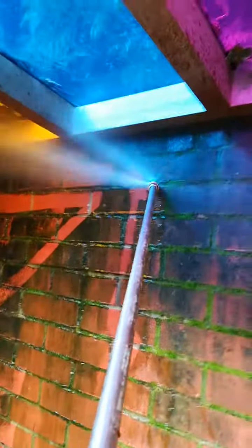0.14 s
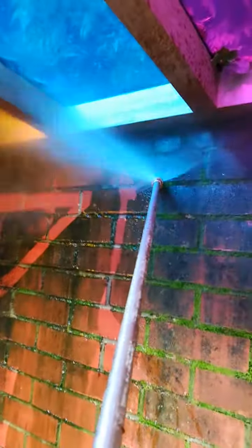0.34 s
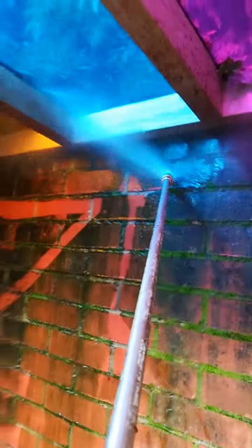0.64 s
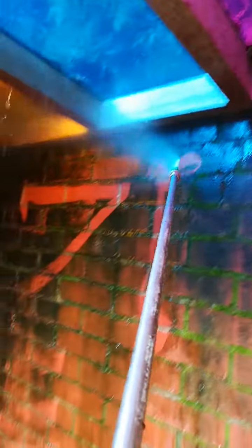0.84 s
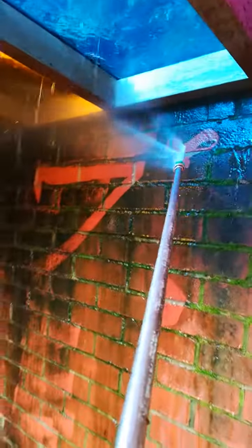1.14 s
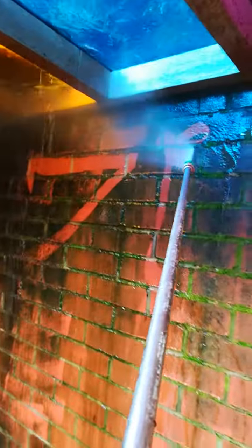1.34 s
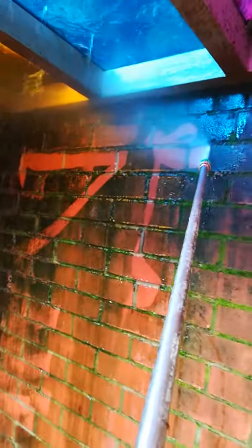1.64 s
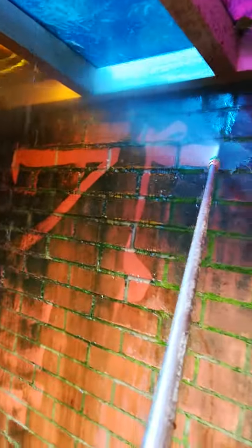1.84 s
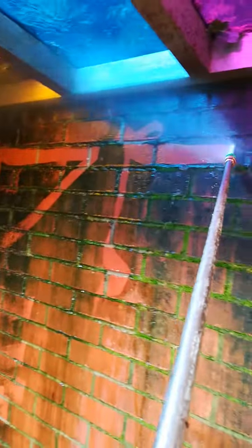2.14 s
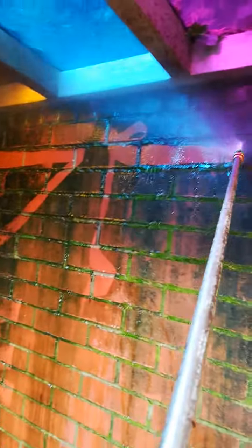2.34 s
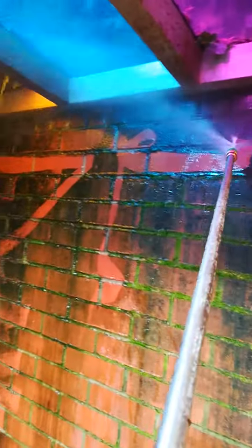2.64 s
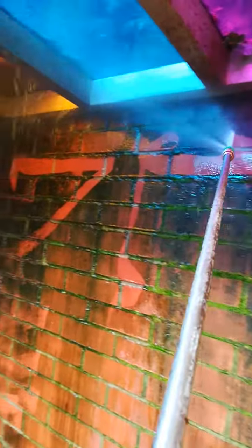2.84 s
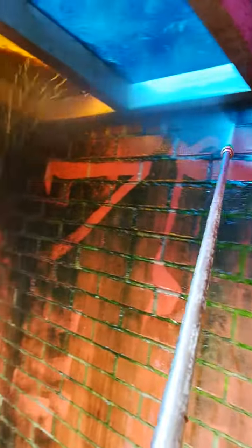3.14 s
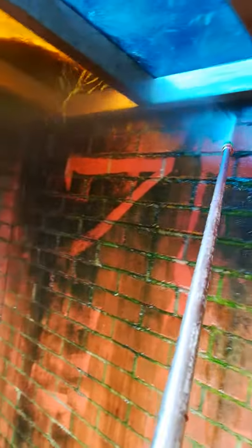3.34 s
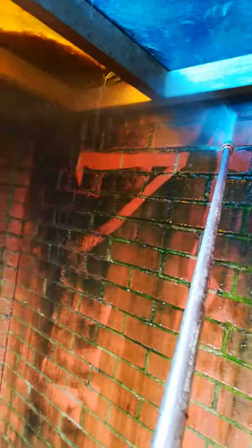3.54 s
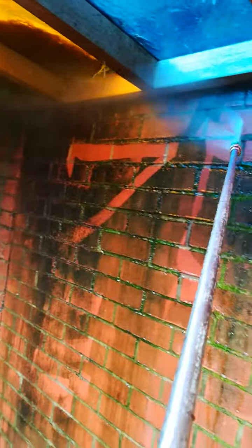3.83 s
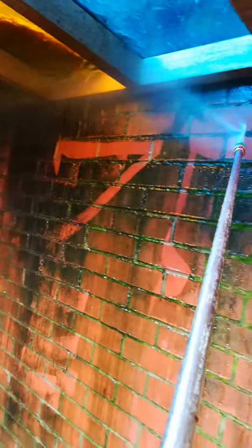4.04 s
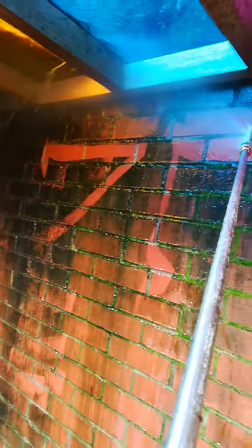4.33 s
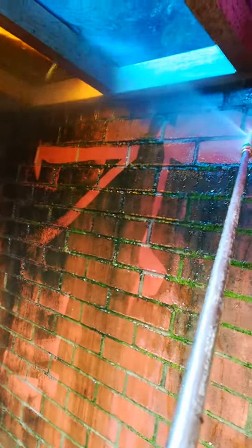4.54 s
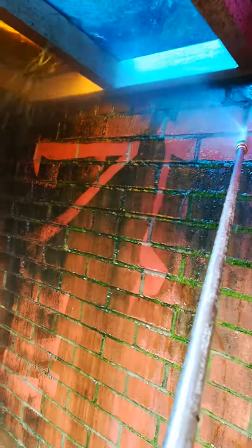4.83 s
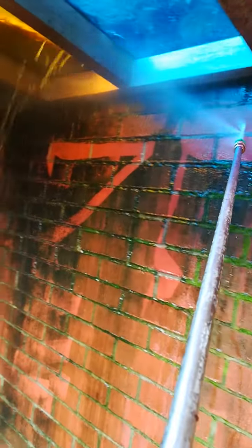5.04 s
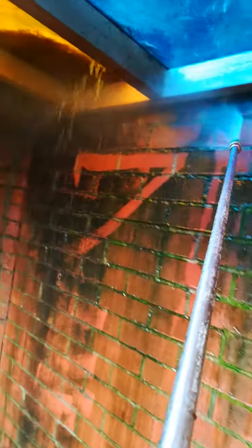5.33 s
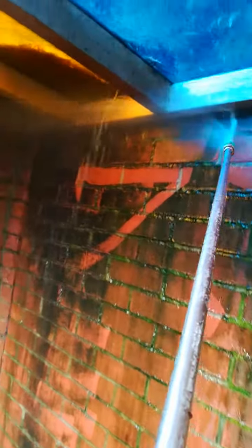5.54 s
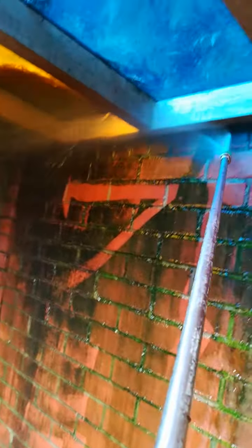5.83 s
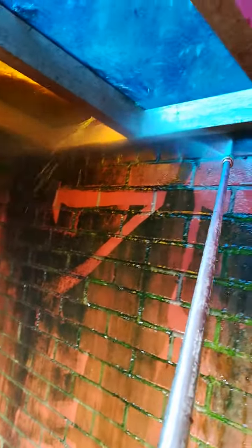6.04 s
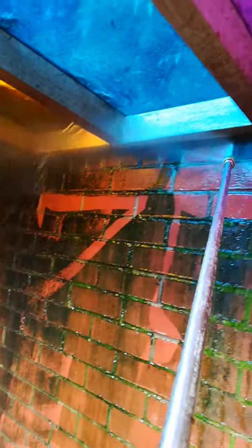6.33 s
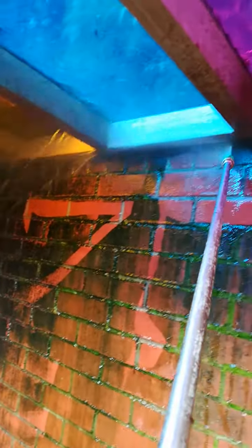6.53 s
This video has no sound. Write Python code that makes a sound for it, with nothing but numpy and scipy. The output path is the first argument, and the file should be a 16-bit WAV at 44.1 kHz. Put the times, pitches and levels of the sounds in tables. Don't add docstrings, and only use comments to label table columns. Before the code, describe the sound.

A high-pressure water jet starts uneven and splashy, with blown air rumbling and booming beneath a low roof. Within a second it bites into brick with a full, bright hiss, fluttering slightly and spitting on edges. The deep air calms. A motor pump hums steadily throughout. Close, hand-held stereo pickup with short, dull wall reflections and a sharply limited top end.

```python
import sys
import numpy as np
from scipy import signal
from scipy.fft import rfft, irfft, next_fast_len
from scipy.io import wavfile

SR = 44100
rng = np.random.default_rng(int(sys.argv[2]) if len(sys.argv) > 2 else 0)


def decibels_to_gain(level_db):
    exponent = np.asarray(level_db, float) / 20
    return 10 ** exponent


def unload_wav(signal):
    wavfile.write(
        sys.argv[1],
        SR,
        np.round(np.clip(np.atleast_2d(signal).T, -1, 1) * 32767).astype(np.int16),
    )


N = 295470
STEP = 20
SHAFT_HZ = 46.282


def rms_one(x):
    return x / np.sqrt(np.mean(x ** 2) + 1e-20)


def per_sample(control):
    return np.interp(np.arange(N), np.arange(0, N, STEP), control)


def in_time(rows):
    s, *columns = np.transpose(rows)
    t = np.arange(0, N, STEP) / SR
    return np.array([np.interp(t, s, c) for c in columns])


def at_hz(rows, hz):
    knots, *columns = np.transpose(rows)
    return np.array([np.interp(np.log(hz), np.log(knots), c) for c in columns])


def drift(rate_hz):
    settle = 4000
    r = np.exp(-2 * np.pi * rate_hz * STEP / SR)
    noise = rng.standard_normal(len(range(0, N, STEP)) + settle)
    return rms_one(signal.lfilter([1], [1, -2 * r, r * r], noise)[settle:])


def between(curves, centres, hz):
    weights = [np.interp(np.log(hz), np.log(centres), one) for one in np.eye(len(centres))]
    return np.array(weights) @ curves


def lean_to(hz):
    t60_s, echo_db, dull_hz = 0.12, -7.5, 2200
    t = np.arange(SR // 4) / SR
    decaying = rng.standard_normal((2, len(t))) * decibels_to_gain(-60 * t / t60_s)
    echoes = np.array([rms_one(side) for side in decaying])
    dull = 1 / (1 + (hz / dull_hz) ** 2)
    return np.abs(1 + decibels_to_gain(echo_db) * dull * rfft(echoes, next_fast_len(N)) / np.sqrt(len(t)))


def turbulence(colour, bands, levels_db, pans_db, shared_db, own_db, count):
    # (frequency [Hz], likeness [0-1], lead of left [radians])
    microphone_pair = [(60, .998, 0), (120, .96, 0), (200, .88, .1), (390, .85, .7), (460, .55, 2.5),
                       (850, .55, 2.2), (1250, .6, 1.5), (1750, .3, 1.1), (2100, .55, 2.9), (2750, .3, 5.2),
                       (3300, .5, 6.4), (4000, .3, 9.4), (5200, .3, 12.6), (7000, .42, 13.0),
                       (15500, .3, 27.0)]
    size = next_fast_len(N)
    hz = np.maximum(np.arange(size // 2 + 1) * SR / size, 1)

    left, other = rfft(rng.standard_normal((2, size)), norm="ortho")
    alike, lead = at_hz(microphone_pair, hz)
    alike = np.clip(alike, 0, 1)
    right = alike * left * np.exp(-1j * lead) + np.sqrt(1 - alike ** 2) * other

    low, high = colour[0][0], colour[-1][0]
    fade = np.clip(2 * hz / low - 1, 0, 1) * np.clip(3 - 2 * hz / high, 0, 1)
    room = np.where(hz > 700, lean_to(hz), 1)
    pair = np.array([left, right]) * decibels_to_gain(at_hz(colour, hz)) * fade * room

    mid_power = 2 * np.abs(pair.mean(axis=0)) ** 2 / size
    band_db = [[10 * np.log10(mid_power[(hz > a) & (hz < b)].sum())] for a, b in bands]
    gains_db = levels_db - band_db

    centres = np.sqrt(np.prod(bands, axis=1))
    slices = np.geomspace(low, high, count)
    out, neighbour = 0, drift(9.8)
    for k, centre in enumerate(slices):
        share = np.interp(np.log(hz), np.log(slices), np.arange(count) == k)
        previous, neighbour = neighbour, drift(9.5)
        level_db = between(gains_db, centres, centre) + shared_db + own_db * (previous + neighbour)
        pan_db = between(pans_db, centres, centre) / 2
        gains = [per_sample(decibels_to_gain(level_db + pan_db)), per_sample(decibels_to_gain(level_db - pan_db))]
        out = out + gains * irfft(pair * share, size, norm="ortho")[:, :N]
    return out


def jet():
    # (time [s], splash, hiss, spray, mist level [dB], then left-right of each [dB])
    jet_sweep = [(0.0, -41, -30, -28, -25, -7, 3.8, 0.0, 1.5),
                 (0.05, -44, -29.5, -29, -25, -4.5, 3.5, -4, -3),
                 (0.2, -41.5, -31, -32.5, -31, -7.5, 4.5, 0.0, -2),
                 (0.28, -39, -25, -33.5, -31, -3.0, 3.0, -0.5, -3),
                 (0.34, -37, -27.5, -33, -31, -5, 4.0, 0.0, 1.0),
                 (0.37, -40.5, -29, -33, -33, -6.5, 4.0, -1.5, -0.5),
                 (0.45, -37, -32, -34.5, -33, -4.5, 3.5, 1, 2.0),
                 (0.58, -42.5, -32, -30.5, -27, -4.0, 4.0, -0.5, 1.0),
                 (0.61, -43.5, -27, -28, -26, -5, 4.7, 0.0, -1),
                 (0.88, -35, -22, -26, -22.5, -7.0, 3.5, -1.5, 0.0),
                 (0.93, -33, -25, -25.5, -24, -5.5, 2.8, 0, -1),
                 (1.1, -33.5, -24.5, -24.5, -24, -6.5, 4.3, -2.0, -1),
                 (1.19, -36, -25, -26, -25, -11, 3.5, 1, -2),
                 (1.31, -34.5, -23.5, -28, -24, 0, 3.3, -1.5, -2),
                 (1.42, -32.5, -21.5, -27.5, -23.5, 0, 3.5, -2, 0.5),
                 (1.53, -35.5, -23, -26.5, -23, -4.5, 3.4, 1, 1),
                 (1.81, -36.5, -23.5, -27, -25, -4, 4.0, 2, 0),
                 (1.96, -34.5, -22, -30, -24, -1, 3.5, 3, 3.0),
                 (2.03, -36, -22.5, -29.5, -23, 0, 4.0, 4, 1.5),
                 (2.2, -39.5, -21, -32, -25, -4.0, 4.9, 5, 2),
                 (2.28, -46, -24.5, -32, -26, -3, 3.6, 1, 1.5),
                 (2.52, -41.5, -22.5, -32, -24.5, -3, 4.9, 1.0, 3.5),
                 (2.69, -36.5, -25, -29, -26, -2, 4.5, 5, 0), (2.78, -39.5, -22.5, -31, -25, -1, 4.0, 3, 6),
                 (2.85, -38, -24.5, -29.5, -26, -3, 3.6, 1, 6), (2.93, -38, -24, -28.5, -26, -1, 3.8, 6, 5),
                 (3.19, -37, -24.5, -31, -29, -5.5, 4.5, 1.5, 5.0),
                 (3.32, -38.5, -24.5, -28, -31, -4.5, 5.0, 1, 4.0),
                 (3.34, -33.5, -25, -30.5, -31, -4.0, 4.1, 1.0, 4.5),
                 (3.38, -41, -24, -29, -31, 6, 4.0, -1, 4.0), (3.4, -33, -27, -32, -32, -1.5, 4.0, 8, 3.5),
                 (3.43, -37, -26, -30, -31, -2, 4.5, 1.5, 1.5),
                 (3.58, -36, -23.5, -30, -29, -3, 4.5, 2, 3.0),
                 (3.77, -38.5, -25, -29.5, -29.5, -8, 6.9, 1.5, 5),
                 (3.84, -35, -23, -26.5, -28, -5, 3.8, 2.5, 6), (3.88, -36, -25, -27.5, -30, -8, 6.3, 1, 8),
                 (3.99, -38, -25, -28, -28, -2.5, 5.4, 3, 5.0),
                 (4.72, -38.5, -24.5, -32, -27.5, -4.0, 4.5, 4.5, 5.5),
                 (4.83, -38.5, -26, -29.5, -27.5, -1, 5.5, 4, 6.0),
                 (5.09, -37, -23.5, -30, -28, -7, 5.0, 3, 6),
                 (5.32, -37.5, -27, -27.5, -32, -6.5, 3.5, 1, 6),
                 (5.34, -37, -23, -31, -31, -11, 3.2, 7, 5.0), (5.41, -38.5, -24, -31, -30, -2, 4.5, 2, 7),
                 (5.49, -34, -24, -28.5, -30, -5, 3.8, 1, 6.5),
                 (5.62, -37.5, -24, -27.5, -29, -3.0, 3.5, 2.0, 7.0),
                 (5.71, -38, -25, -28, -29.5, -7, 4.0, 1.5, 5),
                 (6.08, -37, -25.5, -27.5, -29.5, -1.5, 3.5, 1.5, 8),
                 (6.16, -42.5, -26, -29.5, -29, -2.5, 2, 1, 8),
                 (6.38, -36, -24, -29, -27, -1.5, 2.4, 2, 6.0),
                 (6.44, -42, -25.5, -28, -29, -5, 5.5, 1.0, 5),
                 (6.46, -36.5, -24.5, -31, -29, -3.5, 2, 0, 7),
                 (6.61, -41.5, -27.5, -29.5, -30, 1, 3.0, 0.5, 6.5),
                 (6.7, -42, -23, -35, -30, -4.5, 2, 0.5, 5.5)]
    # (low [Hz], high [Hz])
    jet_bands = [(1400, 2600), (3000, 7500), (8000, 10500), (11000, 15700)]
    # (frequency [Hz], left [dB per Hz], right [dB per Hz])
    jet_colour = [(1440, -69.5, -66), (1600, -66, -59.5), (2200, -66, -59.5), (2450, -66.5, -67),
                  (2880, -67, -67), (3480, -60.5, -62.5), (4700, -59, -60), (6100, -54.5, -64.5),
                  (6900, -53.5, -60.5), (8440, -57, -58), (10800, -60, -63.5), (13500, -60, -63.5),
                  (15100, -57.5, -63.5)]
    # (time [s], boost [dB], length [s])
    spits = [
        (1.125, 1.5, .012),
        (1.395, 2, 0.019),
        (2.21, 2.5, .006),
        (3.84, -0.5, .012),
        (5.14, 3.5, .006),
        (6.058, 1, 0.011),
        (6.365, -0.5, .008),
        (6.43, 1.5, .008),
    ]
    levels, pans = np.split(in_time(jet_sweep), 2)
    pans = pans - pans.mean(axis=1, keepdims=True)
    t = np.arange(0, N, STEP) / SR
    flutter_db = 0.2 * drift(22.0) + 0.35 * drift(100.0)
    throb_db = 0.18 * np.sin(2 * np.pi * 3 * SHAFT_HZ * t)
    spit_db = sum(db * np.exp(-((t - s) / length) ** 2) for s, db, length in spits)
    return turbulence(jet_colour, jet_bands, levels, pans,
                      flutter_db + throb_db + spit_db, own_db=0.18, count=9)


def air():
    # (time [s], deep, rumble, boom, wash level [dB])
    gusts = [(0.0, -56, -30, -48, -49), (0.07, -62, -33, -52, -51), (0.15, -59, -45, -50, -48),
             (0.18, -58, -41, -45, -46.5), (0.35, -51, -29, -41, -38), (0.39, -49, -49, -37, -38.5),
             (0.47, -54, -29, -41.5, -42), (0.61, -60, -38, -50, -50), (0.69, -59, -41, -52, -49),
             (0.76, -56, -49, -62, -44), (0.88, -65, -55, -55, -49), (0.95, -67, -51, -52, -42.5),
             (1.32, -61, -56, -51, -44), (1.42, -57, -48, -59, -47), (1.47, -64, -53, -55, -45),
             (1.64, -60, -53.5, -55, -43.5), (1.77, -64, -53, -58, -46), (2.03, -64, -54, -60, -45),
             (2.09, -60, -51, -63, -44), (2.14, -75.5, -55, -61, -53), (2.67, -62, -57, -60, -46.5),
             (2.95, -66, -57.5, -55, -43), (3.45, -66, -48, -45, -40), (3.62, -70, -48, -52, -40),
             (3.66, -64, -47, -57, -40), (3.71, -66, -53, -48, -39), (4.05, -66, -55, -55, -45),
             (4.11, -76, -47, -59, -47), (4.2, -68, -55, -57, -41), (4.31, -63, -55, -59, -45),
             (4.37, -69, -52, -58, -45), (4.44, -62, -58, -58, -44), (4.61, -72, -53.5, -62, -41.5),
             (4.89, -67, -55, -59, -45), (5.13, -68.5, -56, -50, -43), (5.2, -62, -52, -50, -42),
             (5.32, -67, -50, -55, -44), (5.5, -69, -48, -49, -41.5), (5.76, -61, -48, -54, -42),
             (5.8, -66, -48, -53, -44.5), (6.36, -66, -56, -57, -47.5), (6.44, -61, -53, -60, -50),
             (6.61, -67, -52, -61, -54), (6.7, -69, -58, -55, -51)]
    # (low [Hz], high [Hz])
    air_bands = [(25, 60), (80, 220), (305, 395), (800, 1300)]
    # (frequency [Hz], left [dB per Hz], right [dB per Hz])
    air_colour = [(19.7, -90, -87), (47, -75, -73), (70, -84, -84), (98, -70, -69.5), (112, -77, -81.5),
                  (135, -73.5, -69), (176, -76, -76.5), (220, -81.5, -77), (360, -73, -74), (430, -77, -85),
                  (620, -71.5, -77), (774, -71.5, -73.5), (940, -67.5, -72), (1160, -67.5, -67.5)]
    levels = in_time(gusts) - 0.6
    return turbulence(air_colour, air_bands, levels, 0 * levels, 0.25 * drift(19.0), own_db=0.67, count=8)


def pump():
    # (multiple of shaft speed, left [dB], right [dB], lead of left [radians])
    partials = [(3, -55.5, -62.5, -0.05), (5, -57.5, -58.5, 0.8), (6, -45.5, -45, 0.46), (7, -69, -55, 2.7),
                (8, -67, -67, -2.5), (9.3, -51, -49, 0.8), (10, -65.5, -60, 1.2), (11, -48.5, -52.5, -2.5),
                (12, -56, -58.5, -0.6), (13, -55, -33, -0.8), (14, -60, -54, -0.2), (15, -65, -54.5, 2.5),
                (16, -70, -57, -1.6), (17, -78, -51, -6.5), (18, -50, -61, 2.3), (19, -53, -58, -2.5),
                (21, -66, -54, 2.1), (22, -58, -62, 1.2), (23, -69.3, -61.8, 0), (24, -54, -55.4, 1.3),
                (27, -51.5, -49, 1.7), (28, -63, -64, 0), (30, -66.4, -60, -1), (31, -58, -58, -1.5),
                (32, -63, -58, 0.5), (33, -56, -48, 0.3), (34, -72, -57.0, -6)]
    # (time [s], 3rd, 6th, 13th multiple level [dB])
    hum_swell = [(0.0, -52, -51, -43), (0.05, -53, -48, -41.5), (0.11, -47, -44, -43),
                 (0.26, -42, -45, -44), (0.35, -42, -38, -43), (0.41, -55, -40, -42),
                 (0.52, -42, -42, -41.5), (0.61, -50, -45, -42), (0.99, -61, -45, -40),
                 (1.19, -54, -45, -39), (1.29, -68, -46, -39), (1.49, -61, -47, -39),
                 (1.6, -73, -45, -39.5), (1.68, -59, -47, -39.5), (1.98, -62, -44, -39),
                 (2.39, -60, -48.5, -42.5), (2.58, -73, -47.5, -43), (3.06, -67, -46.5, -41),
                 (3.23, -58, -50.5, -40.5), (3.36, -61, -48.5, -41), (3.43, -53, -47, -41),
                 (3.67, -61, -48, -40), (3.71, -56, -48, -40.5), (4.22, -57.5, -46.5, -41.5),
                 (4.25, -68, -47, -41), (4.48, -70, -48, -42), (4.57, -60, -48, -41.5),
                 (4.68, -65, -47, -42.5), (4.85, -58, -48, -41.5), (4.94, -68, -46, -42),
                 (5.02, -59, -49.5, -41.5), (5.26, -60, -49, -41), (5.56, -49, -49, -41.5),
                 (5.62, -51, -48, -41.5), (6.4, -56.5, -48, -43), (6.57, -51, -49, -43),
                 (6.7, -56, -47, -42)]
    swell_db = in_time(hum_swell)
    swell_db = np.clip(swell_db - np.median(swell_db, axis=1, keepdims=True), -9, 5)
    turn = 2 * np.pi * SHAFT_HZ * np.arange(N) / SR
    starts = rng.uniform(0, 2 * np.pi, len(partials))
    out = 0
    for (multiple, left_db, right_db, lead), start in zip(partials, starts):
        waver = 0.072 * np.clip(-35.5 - max(left_db, right_db), 2.5, 20)
        level_db = between(swell_db, [3, 6, 13], multiple) + waver * drift(1.5) + 3
        gain = per_sample(decibels_to_gain(level_db))
        phase = round(multiple) * turn + start + per_sample(0.17 * waver * drift(1.5))
        out = out + gain * np.sin([phase + lead, phase]) * decibels_to_gain(np.array([[left_db], [right_db]]))
    return out


def scene():
    return jet() + air() + pump()


def top_cut(x):
    return signal.sosfilt(signal.butter(12, 15800, fs=SR, output="sos"), x)


def record(dry):
    low_pass = signal.ellip(14, 0.3, 75, 15740, fs=SR, output="sos")
    return top_cut(signal.sosfilt(low_pass, dry))


dry = scene()
out = record(dry)
unload_wav(out)
```